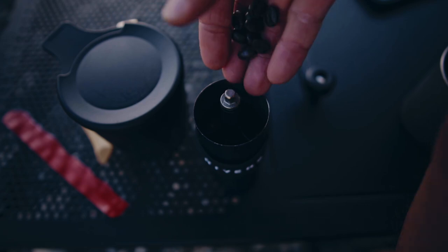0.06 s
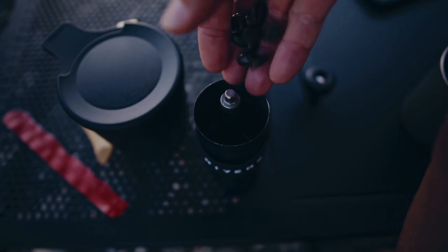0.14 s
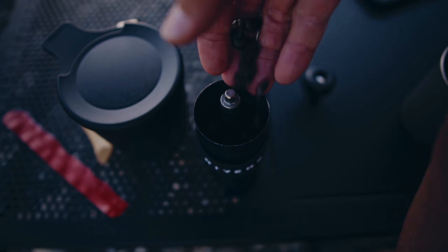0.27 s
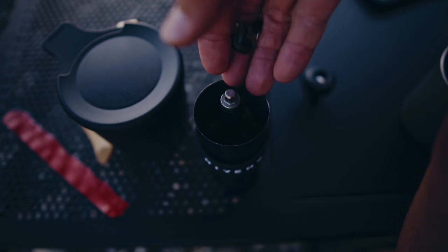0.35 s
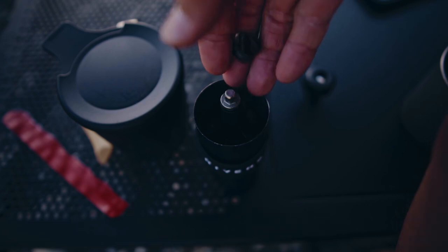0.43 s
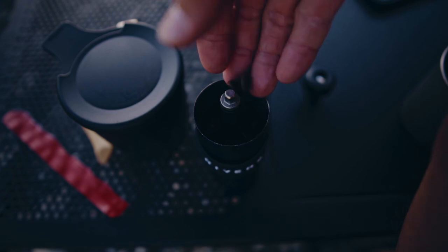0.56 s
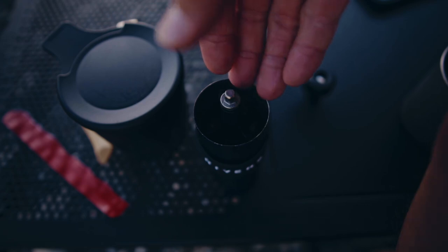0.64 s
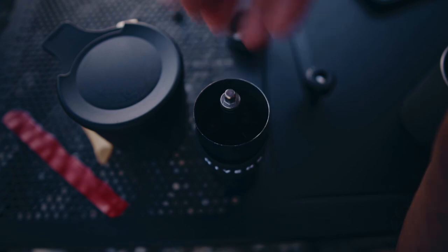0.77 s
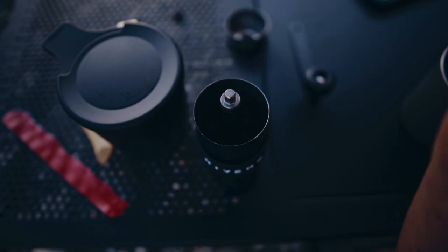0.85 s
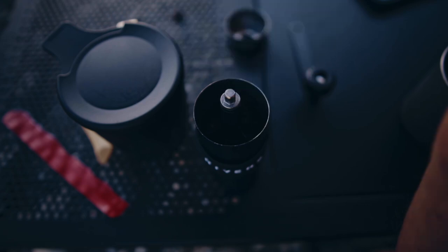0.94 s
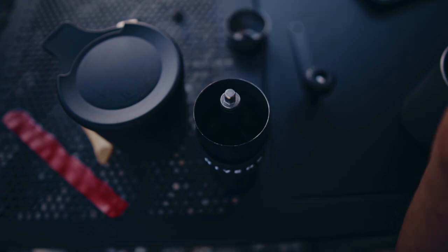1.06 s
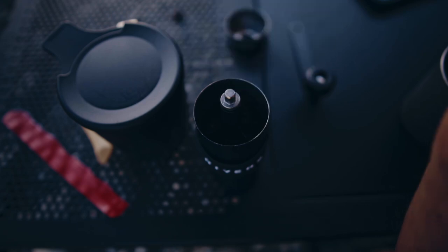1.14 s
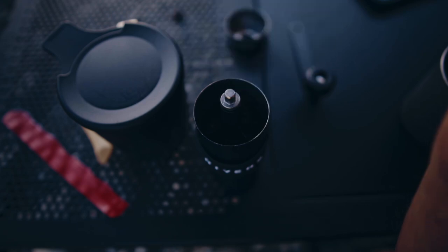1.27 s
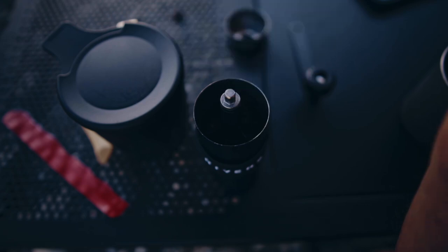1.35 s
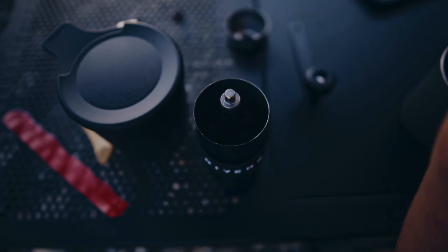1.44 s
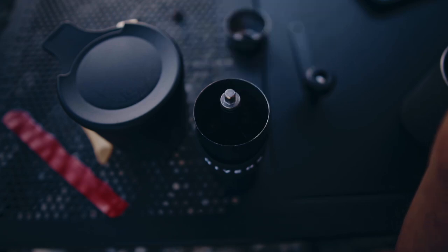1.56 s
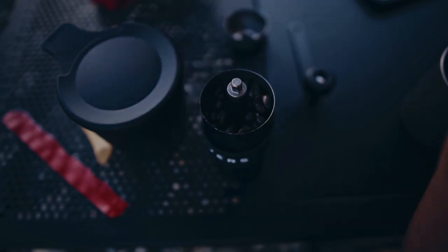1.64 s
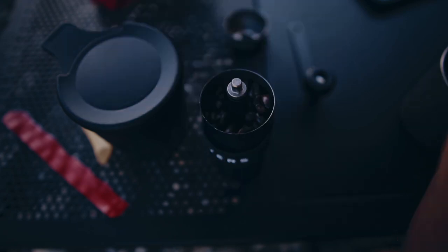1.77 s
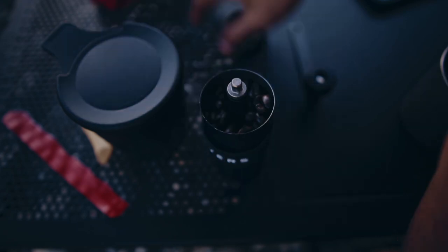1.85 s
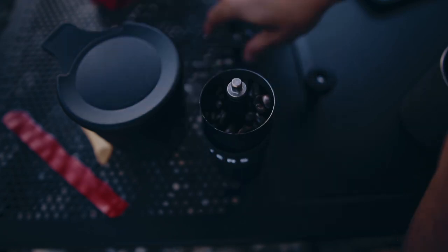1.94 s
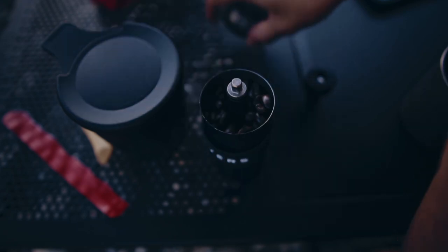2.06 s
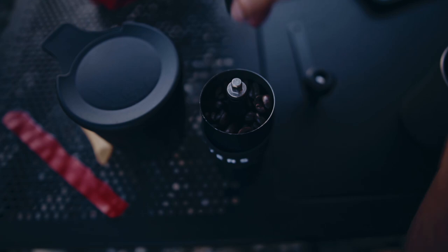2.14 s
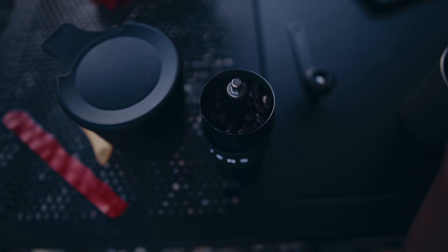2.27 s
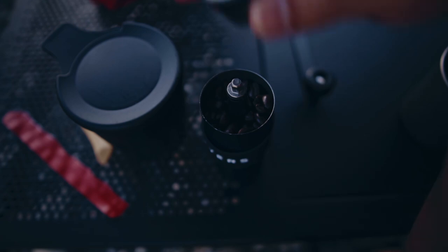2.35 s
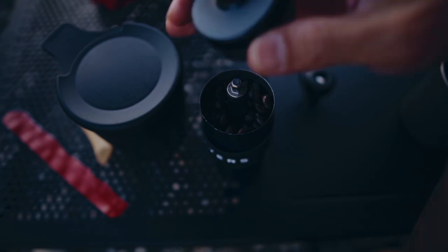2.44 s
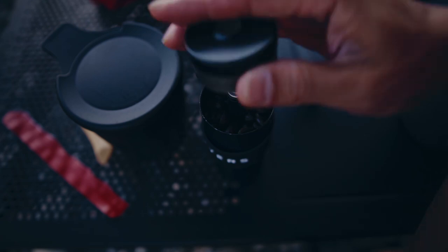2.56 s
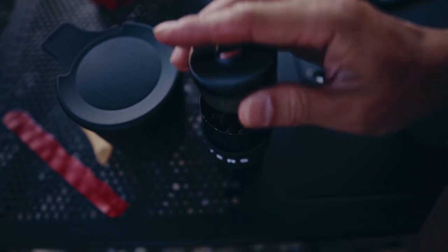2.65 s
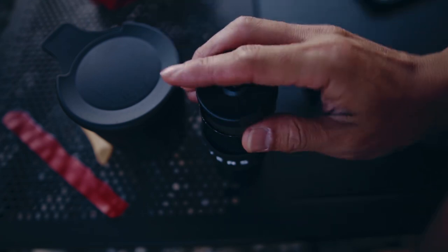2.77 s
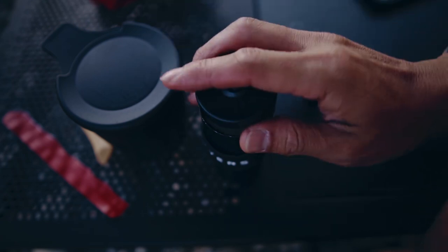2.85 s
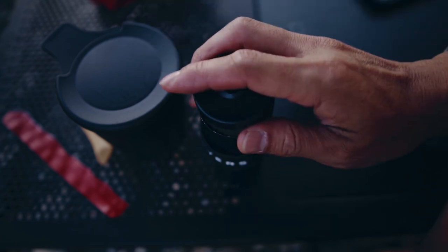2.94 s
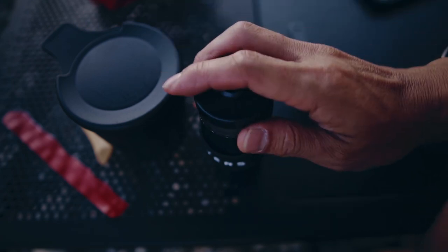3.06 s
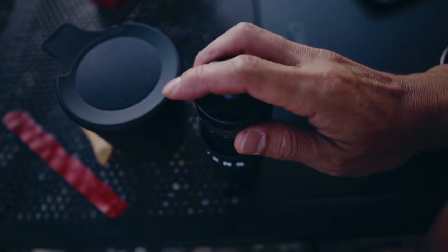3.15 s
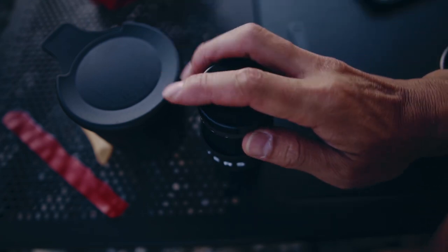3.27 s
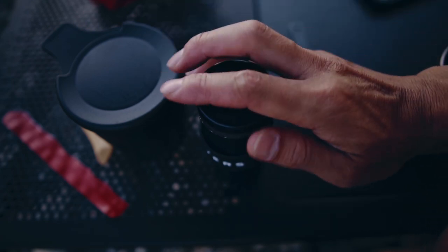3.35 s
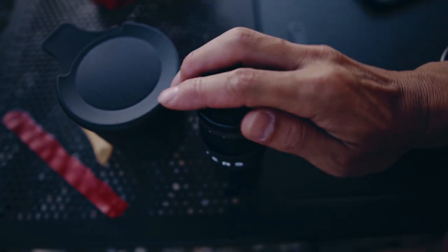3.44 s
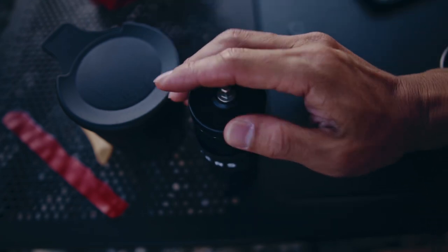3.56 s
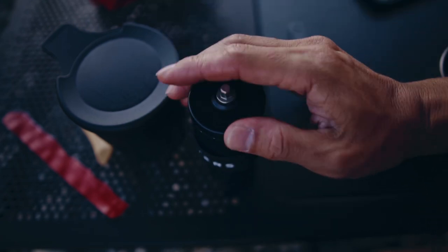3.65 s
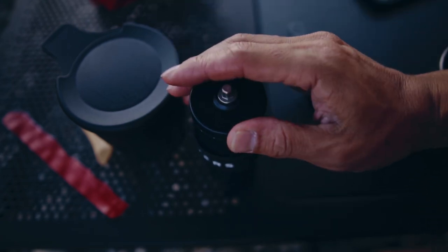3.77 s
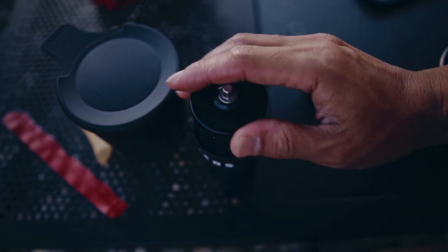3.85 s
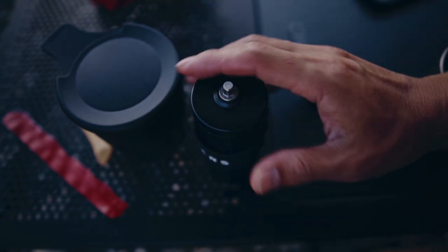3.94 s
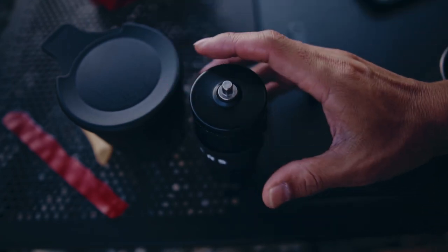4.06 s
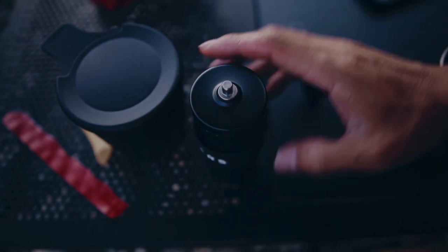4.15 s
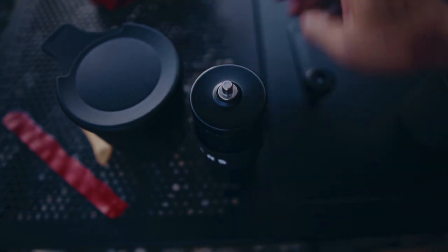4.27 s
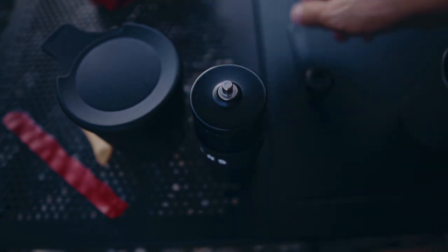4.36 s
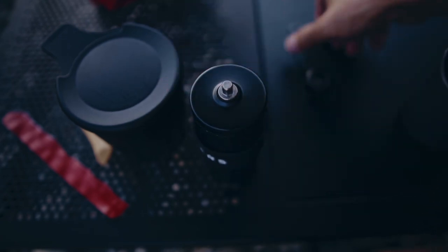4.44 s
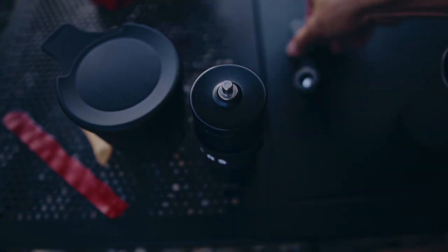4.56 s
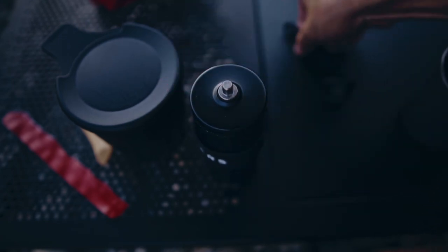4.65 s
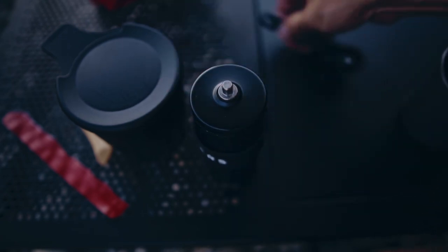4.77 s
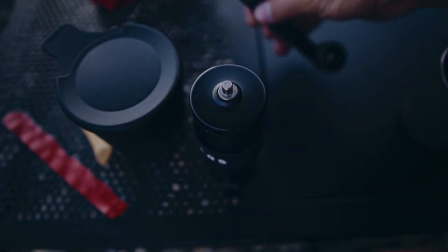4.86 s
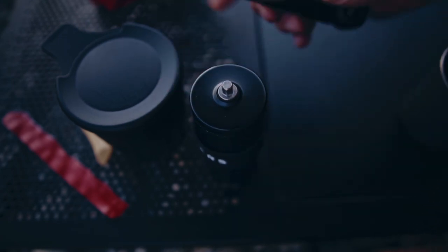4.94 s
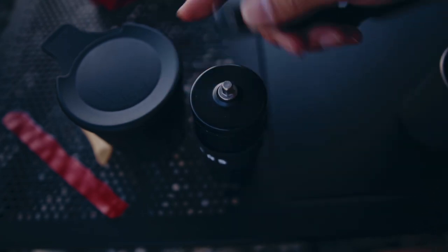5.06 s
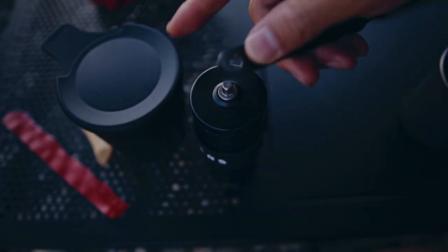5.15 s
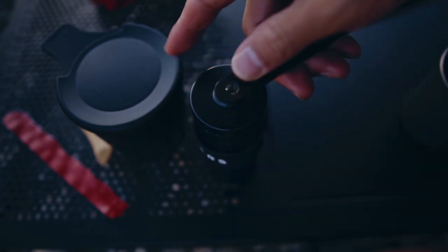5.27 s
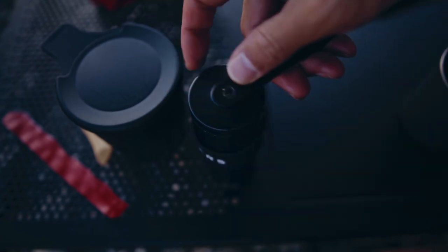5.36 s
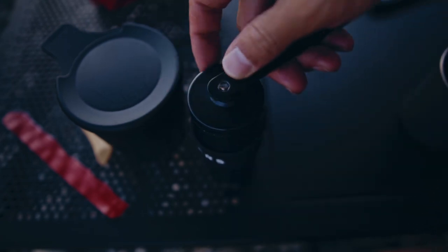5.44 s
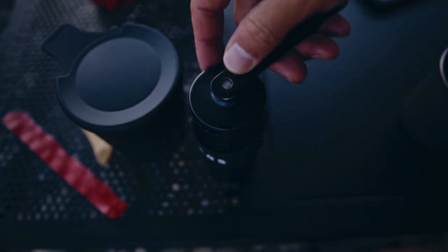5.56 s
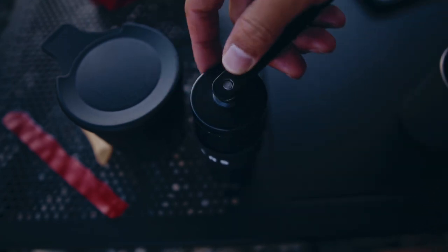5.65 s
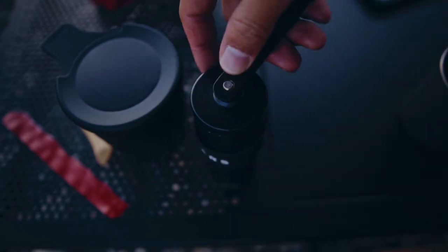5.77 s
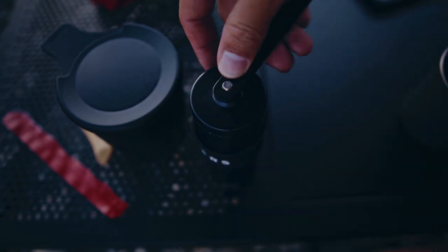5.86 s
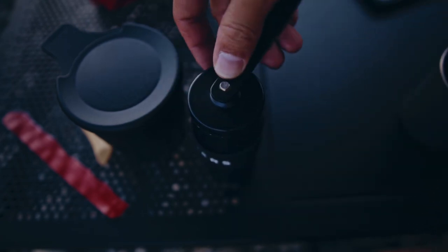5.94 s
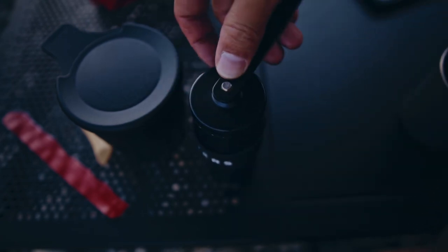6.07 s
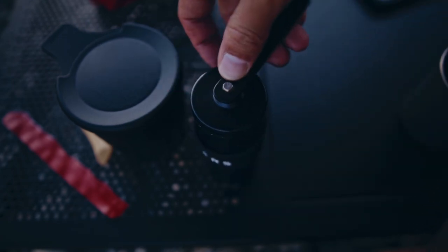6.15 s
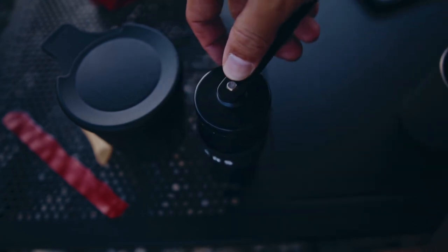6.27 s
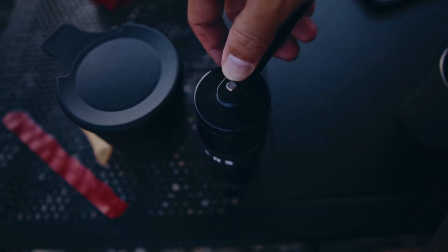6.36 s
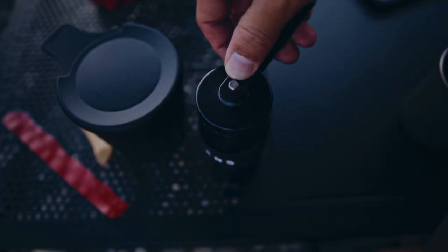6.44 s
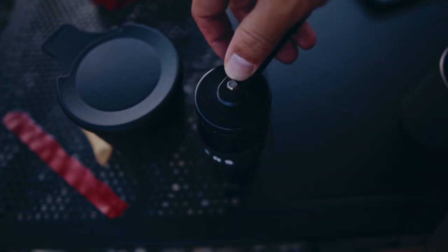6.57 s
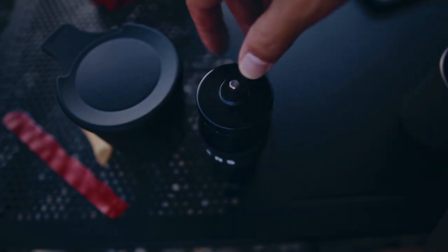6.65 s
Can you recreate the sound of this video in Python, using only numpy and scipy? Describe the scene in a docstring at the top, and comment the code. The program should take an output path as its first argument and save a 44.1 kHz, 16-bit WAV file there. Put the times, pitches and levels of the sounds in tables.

```python
"""Outdoors, close to a camp table: coffee beans rattle into a hand grinder, its lid is lifted, pushed on and
snaps shut, then the steel crank is dragged off the table and fitted. Cicadas hiss, crickets trill, small
birds chirp far off and a light wind thumps the microphone. Beans are short ticks that ring the hopper; blows
and rubs ring each thing and the table top under it; birds and crickets are sine tones; air and wind are
filtered noise."""
import sys
import numpy as np
from scipy import signal
from scipy.fft import rfft, irfft, next_fast_len
from scipy.io import wavfile
from scipy.ndimage import uniform_filter1d

SR = 44100
rng = np.random.default_rng(int(sys.argv[2]) if len(sys.argv) > 2 else 0)


def unload_audio(sound):
    """Save the sound as a 16-bit wav file, at the path given as the first command line argument."""
    columns = np.transpose(np.atleast_2d(sound))
    # keep every value between -1 and 1, then stretch to whole-number steps
    steps = np.round(np.clip(columns, -1, 1) * 32767)
    wavfile.write(sys.argv[1], SR, steps.astype(np.int16))


N = 295911  # length in samples
T = np.arange(N) / SR  # time of each sample in seconds

# In every table, decay_s is the time a sound takes to fall by 60 dB.


def undb(db):
    """Turn decibels into a plain multiplier."""
    return 10 ** (np.asarray(db) / 20)


def unit(x):
    """Scale to an rms (average strength) of 1."""
    return x / np.sqrt(np.mean(x ** 2))


def curve(rows):
    """Join (start_s, value) points with straight lines."""
    return np.interp(T, *np.transpose(rows))


def low(x, hz):
    """Keep what lies below hz."""
    return signal.sosfilt(signal.butter(2, hz, fs=SR, output="sos"), x)


def high(x, hz):
    """Keep what lies above hz."""
    return signal.sosfilt(signal.butter(2, hz, "high", fs=SR, output="sos"), x)


def colour(x, points):
    """Filter by (pitch_hz, level_db) points; white noise of rms 1 leaves with rms near 1."""
    size = next_fast_len(N)
    hz, db = np.transpose(points)
    bin_hz = np.arange(1, size // 2 + 2) * SR / size
    gain = undb(np.interp(np.log(bin_hz), np.log(hz), db))
    return irfft(rfft(x, size) * unit(gain), size)[:N]


def shaped(x, points):
    """Filter like colour, but never sounding ahead of its input, so blows stay sharp."""
    grid = np.linspace(0, SR / 2, 513)
    hz, db = np.transpose(points)
    # minimum_phase takes a square root, so the gain is squared first
    power = undb(2 * np.interp(np.log(grid + 1), np.log(hz), db))
    taps = signal.minimum_phase(signal.firwin2(1023, grid, power, fs=SR))
    return signal.fftconvolve(x, taps / np.sqrt(np.sum(taps ** 2)))[:N]


def ring(x, modes):
    """Ring like a struck object: each mode is a tone that dies away after every push from x."""
    out = 0
    for hz, db, decay_s in modes:
        pole = np.exp((2j * np.pi * hz - np.log(1000) / decay_s) / SR)
        out = out + undb(db) * signal.lfilter([0, pole.imag], [1, -2 * pole.real, abs(pole) ** 2], x)
    return out


def add(out, start_s, x):
    """Mix x into out from start_s on."""
    i = int(start_s * SR)
    out[i:i + len(x)] += x[:N - i]


def fade(decay_s, length=.25):
    """An exponential fade, length seconds long."""
    return np.exp(-np.log(1000) * T[:int(length * SR)] / decay_s)


def walk(rate):
    """A wandering level: random values, rate a second, smoothed twice; spread near 1."""
    k = int(SR / rate)
    steps = np.repeat(rng.standard_normal(N // k + 1), k)
    return 1.7764 * uniform_filter1d(uniform_filter1d(steps, k), k)[:N]


def grit(rate, spread_db, decay_s):
    """Random contacts, rate a second, some harder than the rest, each a short scratch of noise; rms 1."""
    strength_db = spread_db * np.minimum(rng.exponential(size=N), 3)
    hit = (rng.random(N) < rate / SR) * undb(2 * strength_db)  # as power
    power = np.abs(signal.fftconvolve(hit, fade(decay_s / 2, length=.02))[:N])
    return unit(np.sqrt(power) * rng.standard_normal(N))


def swell(peak_s, rise_s, fall_s):
    """A bump in level, rounded on the way up and trailing on the way down."""
    out, near = np.zeros(N), np.abs(T - peak_s) < .5
    late = T[near] - peak_s
    width = np.where(late < 0, rise_s, fall_s)
    out[near] = np.exp(-np.abs(late / width) ** np.where(late < 0, 2, 1.4))
    return out


# tone colour of the outdoor noise: pitch_hz, level_db (per Hz)
AIR_COLOUR = [(20, -5.5), (60, -4), (110, -6), (180, -3.5), (300, -8.5), (550, -13.5), (800, -21.5),
              (1800, -19), (3400, -28), (4350, -30), (4650, -22), (6900, -24.5), (8400, -18), (9500, -26),
              (10500, -37.5), (13000, -42.5), (16000, -49)]
# its loudness, which dips while the crank clatters: start_s, level_db
AIR_LEVEL = [(0.0, -49.5), (0.6, -49), (2.2, -51), (3.7, -50.5), (4.56, -50), (4.67, -60.5), (4.86, -50.5),
             (6.71, -49.5)]


def air():
    """Distant rumble below, cicada hiss above: noise whose broad bands drift a little on their own."""
    noise, out = colour(rng.standard_normal(N), AIR_COLOUR), 0
    for hz in 50 * 3. ** np.arange(6):
        # peel off one band at a time, lowest first
        band = signal.sosfiltfilt(signal.butter(2, hz, fs=SR, output="sos"), noise)
        out = out + band * undb(1.2 * walk(3.))
        noise = noise - band
    return undb(curve(AIR_LEVEL)) * (out + noise)


# loudness of the wind before its gusts: start_s, level_db
WIND_LEVEL = [(0.0, -53.5), (0.3, -36.5), (0.97, -41.5), (0.99, -35.5), (1.74, -57), (1.96, -36.5),
              (2.2, -65.5), (2.41, -46), (3.31, -43), (3.53, -53.5), (3.98, -45), (4.17, -60), (4.52, -42),
              (5.17, -52.5), (5.31, -47), (6.24, -53.5), (6.28, -38.5), (6.71, -53)]
GUST_DB, GUSTS_PER_S = 3, 5.7


def wind():
    """Slow pressure swings on the microphone: very deep noise that comes and goes."""
    points = [(3, -14.0), (8, 3.5), (16, -3.5), (30, -14), (60, -27.5), (150, -71.0)]  # pitch_hz, level_db
    swings = unit(colour(rng.standard_normal(N), points))
    return undb(curve(WIND_LEVEL) + GUST_DB * walk(GUSTS_PER_S)) * swings


# the beans that stand out: start_s, level_db, pitch_hz of the tick, hopper_db (ring against the tick)
BEAN_TICKS = [(0.238, -28.5, 10030, -34), (0.256, -23, 11060, -18.5), (0.2727, -36, 8410, -20),
              (0.2972, -27, 10830, -17), (0.31, -35, 7620, -15), (0.329, -34, 6910, -28),
              (0.3371, -17.5, 7189, -17.5), (0.3448, -27.5, 5810, -1), (0.3496, -27.5, 8364, -29.5),
              (0.3663, -16, 13870, -19), (0.371, -23, 11400, -20), (0.374, -24, 7656, -10),
              (0.3854, -14, 9039, -18.5), (0.396, -22.5, 12890, -18.5), (0.4038, -20.5, 7760, -23),
              (0.408, -10.5, 12000, -30), (0.4194, -15, 13430, -16.5), (0.423, -14, 13220, -27),
              (0.437, -22.5, 7686, -11), (0.4408, -17.5, 10090, -16), (0.4734, -46, 12000, -19.5),
              (0.486, -17.5, 7751, -17), (0.5004, -27, 7310, -17.5), (0.5037, -24, 7996, -18.5),
              (0.5129, -22.5, 12490, -20), (0.5885, -28, 7514, -17), (0.608, -20.5, 7613, -10),
              (0.6154, -28.5, 11300, -25), (0.6203, -32, 10100, -22), (0.6264, -25, 8418, -13.5),
              (0.6305, -20, 12400, -24.5), (0.6336, -15.5, 8229, -17.5), (0.641, -29.5, 7282, -15),
              (0.665, -25, 7757, -10.5), (0.6974, -16.5, 5954, -20.5), (0.7007, -21.5, 10260, -11.5),
              (0.7104, -35, 8185, -16.5), (0.7178, -24, 10690, -24), (0.7207, -23, 11400, -12),
              (0.7268, -29, 5760, -16), (0.7536, -19, 9887, -16), (0.787, -29.5, 5980, -18),
              (0.8363, -33.5, 8720, -29.5)]
# spills of small beans between them: peak_s, rise_s, fall_s, level_db
BEAN_SPILLS = [(.34, 0.01442, 0.0185, -45), (.385, 0.016433, 0.0533, -30), (.50, 0.00991, 0.0132, -42.5),
               (.63, 0.01265, 0.01526, -41), (.705, 0.02723, 0.03028, -42.5)]
# what the hopper rings with: pitch_hz, level_db, decay_s
HOPPER_MODES = [(1860.4, -6.5, 0.01481), (2365, -3.5, 0.003555), (3573.3, -9.5, 0.01756),
                (3974.3, -2.5, 0.013022), (4263.9, -10, 0.01514), (7675.5, -13, 0.02453)]


def beans():
    """Each bean is a millisecond tick of its own pitch that also rings the hopper."""
    (ticks, blows, bed), t = np.zeros((3, N)), T[:441]
    for s, db, hz, hopper_db in BEAN_TICKS:
        noise = rng.standard_normal((2, len(t)))
        tone = np.sin(2 * np.pi * hz * t) * fade(0.00499, length=.01)
        crackle = 1.085 * noise[0] * fade(0.009646, length=.01)
        add(ticks, s, undb(db) / 2 ** .5 * (tone + crackle))
        # a rolling contact feeds the hopper's modes in different shares each time
        add(blows, s, undb(db + hopper_db) * noise[1] * fade(0.0034556, length=.01))
        # beans already lying there answer with a short body of their own
        body = np.sin(2 * np.pi * rng.uniform(1654.0, 5309.6) * t)
        add(bed, s, undb(db + hopper_db) * body * fade(0.008975, length=.01))
    spills = sum(undb(db) * swell(*shape) for *shape, db in BEAN_SPILLS)
    small = spills * grit(1000.0, 2.524, 0.00661)
    hopper = undb(-6.5) * ring(blows + undb(-15.5) * small, HOPPER_MODES)
    return low(high(ticks + small, 6937.0), 12946.0) + high(hopper + undb(-2.5) * bed, 1868.6)


# each chirp bends through three pitches:
# start_s, length_s, first_hz, middle_hz, last_hz, level_db
BIRD_CHIRPS = [(1.04, 0.02289, 4746, 4179, 3779, -62), (1.24, 0.0478, 4090, 3172, 2813, -59),
               (1.33, 0.0196, 3360, 3564, 3664, -61.5), (4.901, 0.04647, 4130, 3250, 3024, -61),
               (4.97, 0.05002, 3064, 3790, 3651, -63.5), (5.285, 0.1071, 4132, 4469, 4606, -56),
               (5.391, 0.02074, 3702, 3565, 3599, -61), (5.483, .055, 7259, 6817, 6578, -55.5),
               (5.699, 0.03737, 4800, 4225, 4052, -58), (5.749, 0.02777, 3533, 3786, 4152, -60),
               (5.931, 0.02646, 2737, 2741, 2806, -60.5)]
CHIRP_ATTACK, CHIRP_FADE_DB = 0.1557, -9  # share of the length; change per whole length after it


def birds():
    """Near-sine whistles with a soft leafy echo; their level wavers."""
    out, waver = np.zeros(N), walk(150.)
    for s, length, *hz, db in BIRD_CHIRPS:
        u = T[:int(length * SR)] / length  # 0 to 1 through the chirp
        fade_db = CHIRP_FADE_DB * np.maximum(u - CHIRP_ATTACK, 0)
        waver_db = 2.58 * waver[int(s * SR):][:len(u)]
        attack = np.sqrt(np.sin(np.pi * u)) * np.minimum(u / CHIRP_ATTACK, 1)
        level = attack * undb(db + fade_db + waver_db)
        pitch = np.interp(u, [0, .5, 1], hz) * (1 + .005 * waver[:len(u)])
        add(out, s, np.sqrt(2) * level * np.sin(2 * np.pi * np.cumsum(pitch) / SR))
    tail = fade(0.06583)
    echo = rng.standard_normal(len(tail)) * tail
    return out + undb(-24) * signal.fftconvolve(out, echo)[:N]


# blows on each thing: start_s, level_db, click_hz, then against level_db:
# upper_click_db, treble_crack_db, own_ring_db, table_db
BLOWS = { "tin": [(1.477, -40.5, 1117, -11.5, -12, -18.5, -1), (1.929, -26, 1149, -7.5, 3, -30.5, -1.5)],
         "lid": [(2.747, -34.5, 1114, -18.5, -22.5, -24, -10.5), (2.787, -18, 2658, -7, -9.5, -8.5, -5.5),
         (2.804, -17, 1354, -1, -7.5, -17, -7.5), (3.341, -35, 1563, -7.5, -13, -20, -10.5),
         (3.383, -30.5, 1076, -6.5, -30.5, -21.5, -12), (3.432, -37, 1866, -12, -14.5, -21.5, -8.5),
         (3.486, -42, 1995, -7, -13.5, -11, -12.5), (3.6168, -4, 4133, -14.5, -33.5, -27.5, -25.5),
         (3.649, -1.5, 3197, 2.5, -9.5, -11.5, -19.5), (3.751, -38, 1045, -11, -19.5, -9.5, -11),
         (3.815, -35.5, 1822, -16.5, -22.5, -27, -11), (3.833, -40, 1080, -7.5, -17.5, -14.5, -14),
         (3.844, -33, 1816, -15, -22.5, -32.5, -12), (3.904, -38.5, 1470, -15, -21.5, -20.5, -11),
         (4.026, -45, 2057, -9, -16.5, -20, -8)], "crank": [(4.476, -30.5, 880, -19.5, -19, -27.5, -8.5),
         (4.482, -38, 910, -10.5, -6.5, -23.5, -9.5), (4.541, -29, 1060, -20.5, -28.5, -35.5, -7),
         (4.572, -19, 1177, -7, -28.5, -34, 0), (4.5768, -10, 1944, 3.5, -5.5, -15.5, -8),
         (4.603, -21.5, 1121, 2, -16, -26.5, -10.5), (4.626, -27, 1060, 0, -20.5, -28, -14),
         (4.6597, -1.5, 1086, -5, -24, -29, -14.5), (4.665, -9, 1242, -4, -15, -10.5, -12),
         (4.671, -12.5, 1251, -2.5, -21, -37.5, -9.5), (4.692, -19, 1251, 1.5, -25, -34.5, -8.5),
         (4.71, -14.5, 1240, -5, -23, -34.5, -7), (4.738, -15, 1266, -4.5, -14, -27, -11.5),
         (4.762, -17, 1247, -8, -29, -35, -9.5), (4.776, -18.5, 1221, -9.5, -29.5, -34, -15.5),
         (4.786, -20.5, 1229, -11, -32, -38, -11)], "shaft": [(5.375, -18, 3275, 1.5, -0.5, -13, -11.5),
         (5.5505, -14.5, 5820, -14.5, -3.5, -19.5, -19.5), (5.557, -31, 5796, -12, 0, -20.5, -15),
         (5.898, -31.5, 3940, -11, -14.5, -31, -13.5)], "body": [(3.6488, -13, 347.5, -20.5, -34, -19, -14),
         (5.831, -37.5, 979, -7, -14, -26.5, -7.5), (6.413, -27.5, 1323, -6.5, -12, -25.5, -7),
         (6.42, -23.5, 1003, -21, -31, -13, -9.5)], "rim": [(2.272, -44.5, 3623, -9.5, -16.5, -13, -16)], }
# how a blow on each thing sounds: upper_click_hz, click_decay_s, table_decay_s,
# table_bright_db (against table_db), thump_db (against level_db)
BLOW_SOUND = {"tin": (4700, 0.1314, 0.0957, 0.5, -5.5), "lid": (3788, .0095, 0.1127, 1.5, -29.5),
              "crank": (2780, .0075, 0.0631, -2, -41.5), "shaft": (2299.5, 0.0011, 0.1681, -2, -26.5),
              "body": (2200, 0.036, 0.1325, -6.5, -10.5), "rim": (5060, .012, .1, -4, -24)}
THUMP_DECAY_S = 0.08867


def knock(thing, own, click, crack, dull, bright, boom):
    """A blow clicks, cracks, starts the thing's own ring and shakes the table."""
    high_hz, click_decay, table_decay, bright_db, thump_db = BLOW_SOUND[thing]
    t = T[:len(fade(1))]
    for s, db, low_hz, high_db, crack_db, own_db, table_db in BLOWS[thing]:
        noise = rng.standard_normal((3, len(t)))
        tones = np.sin(2 * np.pi * low_hz * t) + undb(high_db) * np.sin(2 * np.pi * high_hz * t)
        # contact builds over a millisecond
        add(click, s, undb(db) * tones / 2 ** .5 * fade(click_decay) * (1 - fade(0.0017603)) ** 2)
        add(crack, s + 0.00045, undb(db + crack_db) * noise[0] * fade(0.009894))
        add(own, s + .0005, undb(db + own_db) * np.ones(1))
        # the table top fills slowly with the blow and loses its treble first
        tail = undb(db + table_db) * noise[1] * (1 - fade(0.005573)) * fade(table_decay)
        add(dull, s, tail)
        add(boom, s, undb(db + thump_db) * noise[2] * fade(THUMP_DECAY_S))
        add(bright, s, undb(bright_db) * tail * fade(0.2453))


# each thing slid or rubbed: peak_s, rise_s, fall_s, table_db, hiss_db, own_ring_db
SLIDES = { "tin": [(1.47, 0.03908, 0.0155, -56.5, -59, -60.5), (1.55, 0.04069, 0.04955, -43, -51.5, -71),
          (1.63, 0.0316, 0.00839, -56, -57, -60), (1.942, 0.01033, 0.016434, -28, -34, -38),
          (2.007, .019, 0.02959, -33, -35, -32.5)], "lid": [(2.825, 0.01622, 0.03574, -29, -63.5, -61.5),
          (3.055, 0.01855, 0.01001, -43.5, -55, -53.5), (3.245, 0.01651, 0.02015, -39, -60.5, -74),
          (3.355, 0.01184, 0.00887, -47, -66, -69.5), (3.662, 0.00517, 0.02712, -33.5, -40, -59.5),
          (3.95, 0.046, 0.06194, -49.5, -68.5, -82)], "crank": [(4.63, 0.0325, 0.0686, -23.5, -48.5, -47),
          (4.70, 0.0481, 0.03955, -27.5, -57.5, -51), (4.76, 0.04035, 0.02639, -24.5, -55, -59.5),
          (4.81, 0.02156, 0.01897, -31, -50, -68)], "shaft": [(5.545, 0.00522, 0.0154, -46.5, -42, -60)],
          "body": [(5.385, 0.00553, 0.01984, -47.5, -68, -38.5), (5.87, 0.05576, 0.08285, -50, -64, -64),
          (6.425, 0.00702, 0.02386, -45, -74, -38.5), (6.70, 0.0182, .018, -57, -69, -69.5)],
          "rim": [(2.17, 0.0859, 0.03536, -70, -57, -63.5), (2.29, 0.034, 0.015, -64, -55.5, -67),
          (2.37, 0.03547, 0.02468, -65.5, -55, -59.5), (2.49, 0.0152, 0.0211, -71.5, -63, -66),
          (2.56, 0.0207, 0.02506, -72.5, -59, -72.5), (3.53, 0.00592, 0.03356, -56, -63.5, -47),
          (3.60, 0.05068, 0.013, -54.5, -65, -50.5), (3.725, 0.01992, 0.00807, -49.5, -50, -50.5)], }
# how a rub of each thing feels: bright_db and boom_db (against table_db), contacts_per_s,
# spread_db of their strength, decay_s of one contact (below zero: it grows through its 20 ms)
SLIDE_FEEL = {"tin": (0, -8, 902.5, 2.5, -1.515), "lid": (-7, -9, 900., 2.5, 0.0017),
              "crank": (-5.5, -23.5, 800.5, 2.5, 0.0395), "shaft": (2, -5, 900., 2, -2.24),
              "body": (-15, 0.5, 899.5, 2.5, -0.0478), "rim": (-1.5, 1.5, 900., 2, -0.1721)}


def rub(thing, modes, own, crack, dull, bright, boom):
    """A slide is many tiny contacts that hiss, ring the thing and shake the table."""
    bright_db, boom_db, contacts, spread_db, contact_decay = SLIDE_FEEL[thing]
    rough = grit(contacts, spread_db, contact_decay)
    # a mode fed steadily gathers energy for as long as it rings
    gathered = np.sqrt(sum(undb(2 * db) * decay * SR / 4 / np.log(1000) for _, db, decay in modes))
    for s, rise, fall, table_db, hiss_db, own_db in SLIDES[thing]:
        push = swell(s, rise, fall) * rough
        dull += undb(table_db) * push
        bright += undb(table_db + bright_db) * push
        boom += undb(table_db + boom_db) * push
        crack += undb(hiss_db) * push
        own += undb(own_db) * push / gathered


# what the table top rings with: pitch_hz, level_db, decay_s
TABLE_MODES = [(236.6, -4.5, 0.042), (354, -12, 0.027), (513.54, -9.5, 0.07203), (735.4, -5, 0.0447),
               (1001.1, -3, 0.0844), (1095.4, -1.5, 0.1045), (1243, 0, 0.08785), (1365.3, -8, 0.0721),
               (1443.4, -18.5, .1), (825.38, -7.5, 0.13), (1761, -11, 0.0843), (2050, -6.5, 0.11343),
               (2718, -3, 0.0797)]
# its broad thud: pitch_hz, level_db (per Hz)
THUD_COLOUR = [(50, -47), (150, -26.5), (330, 1), (700, -12), (1200, 1.5), (1700, -6.5), (2800, -8),
               (5000, -14.5), (9000, -31), (16000, -61)]
THUD_DB = -2.0566


def table_top(dull, bright):
    """The table top rings in its own modes over a broad thud."""
    table = low(low(dull, 1770.0), 1770.0) + high(bright, 1820.0)
    ringing = low(high(ring(table, TABLE_MODES), 223.0), 4766.0)
    return undb(-35.5) * ringing + undb(THUD_DB) * shaped(table, THUD_COLOUR)


# what each thing rings with: pitch_hz, level_db, decay_s
THING_MODES = { "tin": [(2207, -10, .14), (2519, -8, .18), (2735, -16, .3), (2900, -8, .13), (3171, -6, .2),
               (3252, -2.5, .28), (3467, -8, .11), (3650, -12, .2), (4032, -2, .13), (4727, -5.5, .15),
               (5319, -9, .1), (7084, -18, .07)], "lid": [(2620, -2, .03), (2900, 0, .015), (3800, 0, .015),
               (5200, 3, .018), (7600, -13, .025), (11200, -12, .025)], "crank": [(6090, 0, .08),
               (6530, -14, .06), (10140, -6, .04), (13960, -29, .08), (15600, -38, .08)],
               "shaft": [(3618.7, 3, 0.0268), (8003, 1, 0.01894), (10410, 0.5, 0.02224),
               (13960, -6, 0.0356)], "body": [(1009.7, -3, 0.07186), (1265, 2.5, 0.04623)],
               "rim": [(953, -6, .05), (3620, -1, .04), (5060, 0, .03), (7700, -14, .04), (13500, -19, .04),
               (15200, -26, .05)], }
# friction and cracks: pitch_hz, level_db (per Hz)
HISS_COLOUR = [(1500, -23), (3000, 3), (6000, 2.5), (10000, -5), (14000, -15), (16000, -20)]
# the table's lowest sway: pitch_hz, level_db (per Hz)
BOOM_COLOUR = [(40, -15.5), (90, -5.5), (200, -6), (370, -0.5), (550, -13.5), (1500, -47.5)]


def handling():
    """Blows and slides: clicks, each thing's own ring, a hiss of friction, and the table underneath."""
    out, dull, bright, boom, crack = np.zeros((5, N))
    for thing, modes in THING_MODES.items():
        own = np.zeros(N)
        knock(thing, own, out, crack, dull, bright, boom)
        rub(thing, modes, own, crack, dull, bright, boom)
        out += high(ring(own, modes), 836.0)
    return out + shaped(crack, HISS_COLOUR) + shaped(boom, BOOM_COLOUR) + table_top(dull, bright)


# each cricket has three lists: its tones (pitch_hz, level_db),
# its loudness (start_s, level_db, tilt_db per kHz above 5 kHz),
# and the middles of some wing strokes (middle_s, stroke_number)
CRICKET_SONGS = [ ([(4600, -7), (4960, -6), (5320, -4), (5705, 0), (6070, -9), (6820, -12), (7570, -9)],
                 [(1.64, -83.5, 0), (1.66, -61.5, -0.5), (2.28, -58.5, 2), (2.45, -59, -7),
                 (2.75, -61.5, -8), (3.4, -66.5, -5.5), (4.6, -71, -2), (5.0, -84.5, 0.5)], [(1.605, -4),
                 (2.219, 5), (3.062, 17), (5.07, 46)]), ([(4690, -2), (5070, -1), (5250, 0)],
                 [(5.3, -85, -0.5), (5.65, -65, 0.5), (6.2, -66, 2), (6.71, -67, 0)], [(5.076, -12),
                 (6.824, 15)]), ]
STROKE_SHARE = .65  # part of each stroke that sounds


def cricket():
    """Wing teeth give several high tones at once, switched on for part of each stroke."""
    out = 0
    for tones, rows, strokes in CRICKET_SONGS:
        s, level_db, tilt_db = np.transpose(rows)
        level, tilt = np.interp(T, s, level_db), np.interp(T, s, tilt_db)
        from_middle = np.abs((curve(strokes) + .5) % 1 - .5)
        # averaging softens the switching
        stroke = uniform_filter1d(1. * (from_middle < STROKE_SHARE / 2), size=300)
        for k, (hz, db) in enumerate(tones):
            gain = undb(level + db + tilt * (hz / 1000 - 5) + 1.9 * walk(9.0))
            # the phase wanders, so the tone is not perfectly steady
            out = out + stroke * gain * np.sin(2 * np.pi * hz * T + 0.84 * walk(30.) + k * k)
    return out


def scene():
    """All the sounds together, as one channel."""
    return (air() + wind() + beans() + birds() + handling() + cricket())[None]


def record(dry):
    """The recorder clips the hardest peaks and cuts the top above 16 kHz."""
    top_cut = signal.ellip(8, .2, 70, 16000, fs=SR, output="sos")
    return signal.sosfilt(top_cut, np.clip(dry, -.95, .95))


dry = scene()
out = record(dry)
unload_audio(out)
```